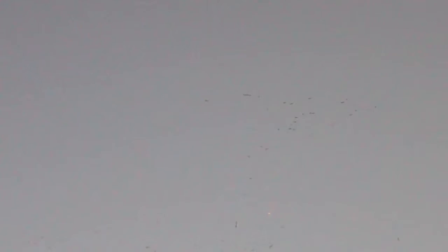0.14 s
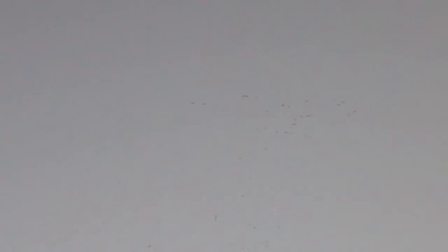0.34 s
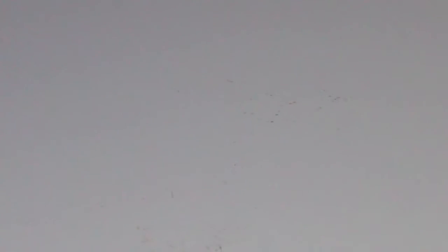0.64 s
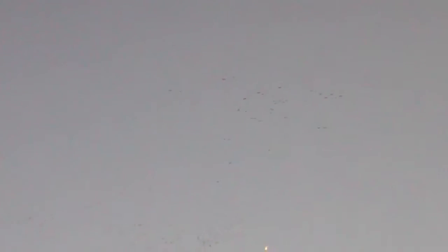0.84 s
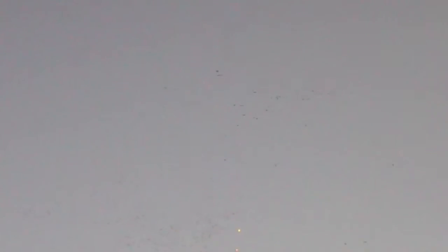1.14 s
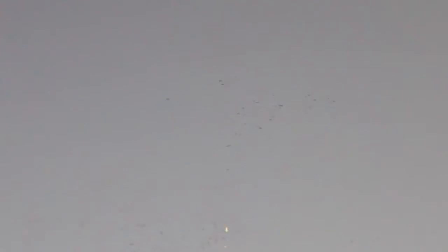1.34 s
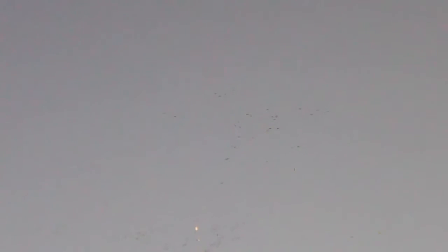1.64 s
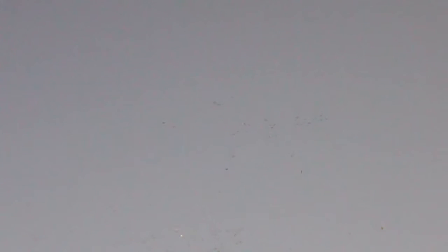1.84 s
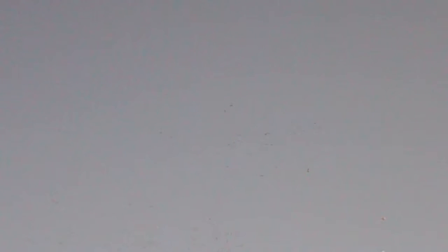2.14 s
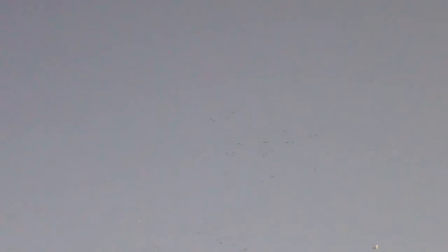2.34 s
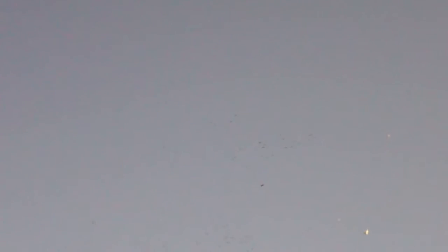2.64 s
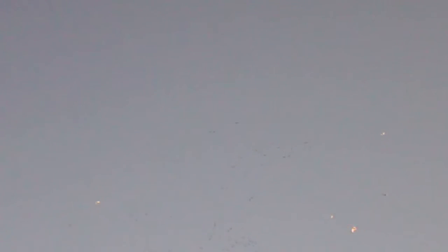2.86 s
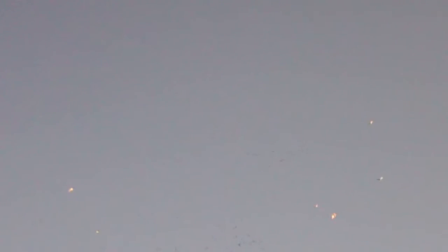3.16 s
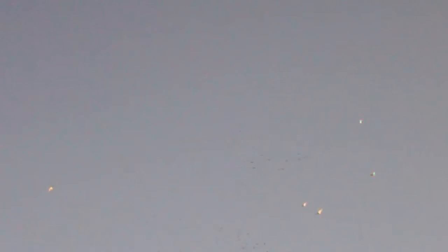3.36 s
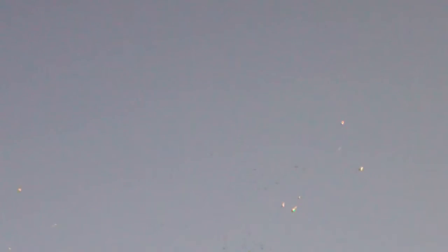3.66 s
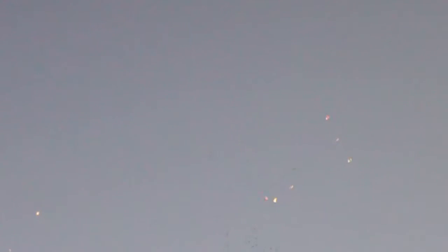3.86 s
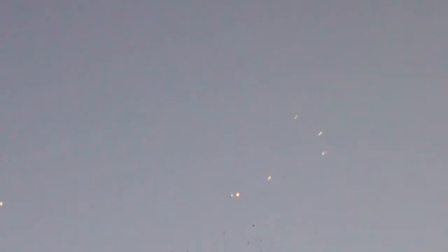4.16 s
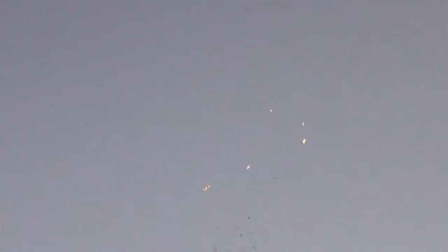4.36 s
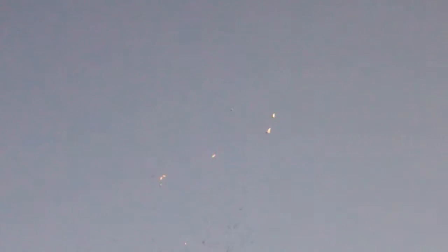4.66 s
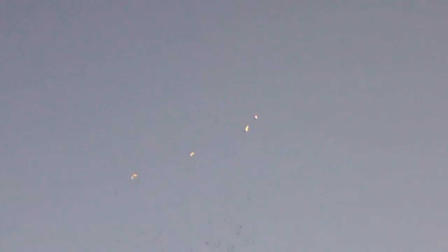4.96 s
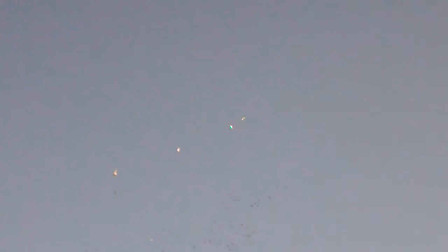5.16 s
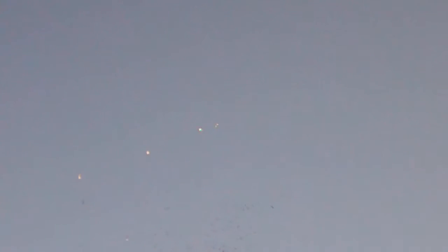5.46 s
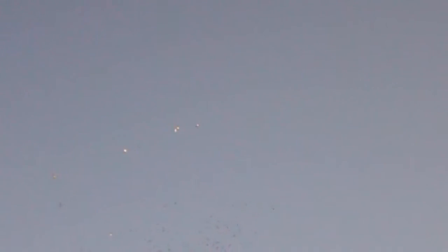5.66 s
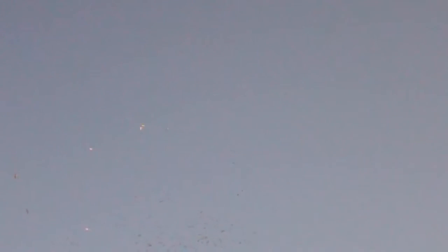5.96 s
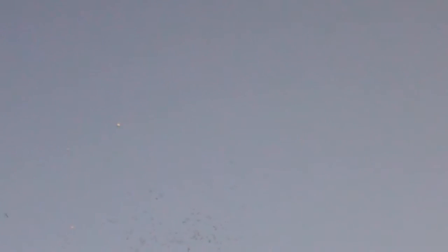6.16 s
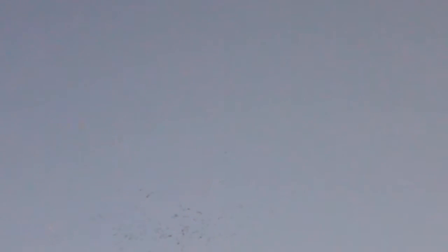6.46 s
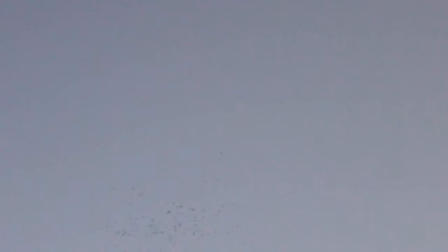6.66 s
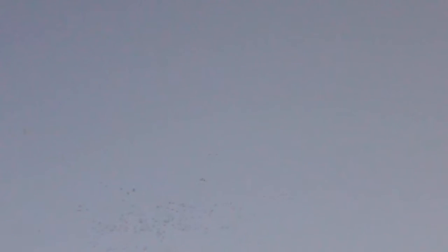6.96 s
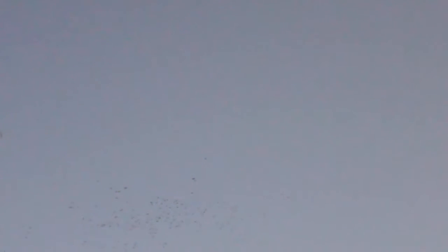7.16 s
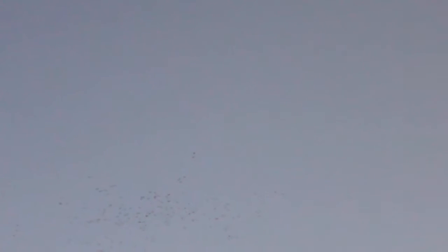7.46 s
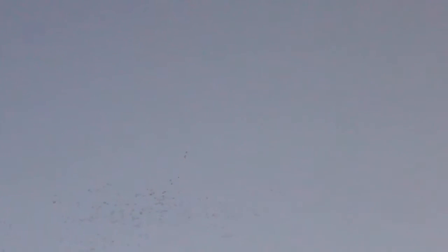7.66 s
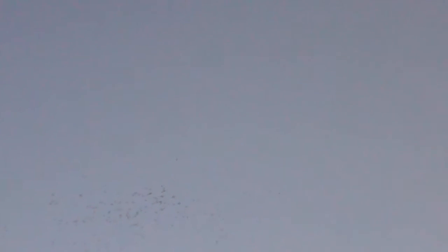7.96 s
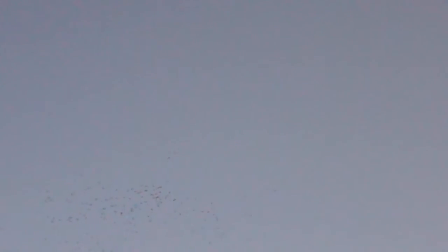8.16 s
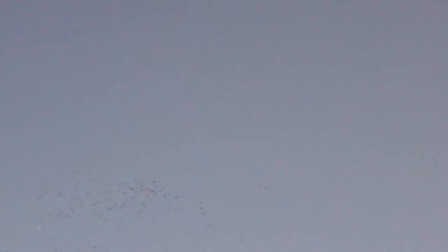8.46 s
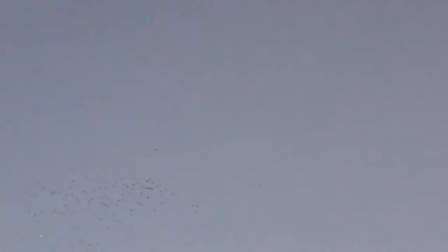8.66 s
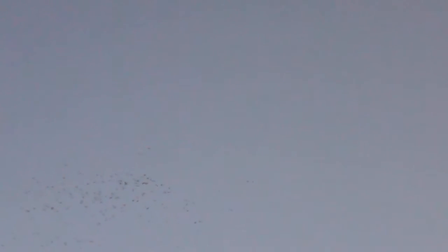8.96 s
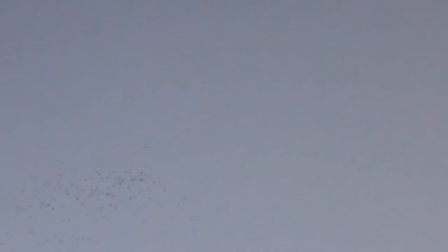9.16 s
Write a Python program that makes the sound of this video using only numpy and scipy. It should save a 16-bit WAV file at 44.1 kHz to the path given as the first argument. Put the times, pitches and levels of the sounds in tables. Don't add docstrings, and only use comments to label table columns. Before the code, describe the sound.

Hundreds of flying crow-like birds chatter in surges while nearer gulls yelp and cry, with hoarse falling caws later, thinning toward the end.

```python
import sys
import numpy as np
from scipy import signal
from scipy.fft import rfft, irfft, next_fast_len
from scipy.io import wavfile
from scipy.ndimage import uniform_filter1d, map_coordinates

SR = 44100
rng = np.random.default_rng(int(sys.argv[2]) if len(sys.argv) > 2 else 0)


def undo_db(level):
    steps = np.asarray(level, float) / 20
    return 10 ** steps


def put_to_file(sound):
    columns = np.atleast_2d(sound).T
    safe = np.clip(columns, -1, 1)
    whole_steps = np.round(safe * 32767)
    wavfile.write(sys.argv[1], SR, whole_steps.astype(np.int16))


N = 410571

# freq_hz, density_db_per_hz
AIR_SPECTRUM = [(20, -22), (40, -10), (78, -2), (150, -8.5), (290, -3.5), (420, -8), (560, -5),
                (1100, -4.5), (2000, -9), (3200, -17.5), (7900, -21.5), (14200, -18)]
# freq_hz, correlation
AIR_LIKENESS = [(60, 0.98), (400, 0.81), (1500, 0.83), (5000, 0.015)]
# freq_hz, level_db
CAMERA_WHINE = (7300, -71.5)

# time_s, level_db
MURMUR = [(0, -48), (3.6, -45.5), (6, -50.5), (6.5, -45.5), (7.5, -45), (8, -54), (8.6, -61.5), (9.31, -59)]
# middle_s, half_length_s, level_db
SURGES = [(.01, 0.13, -43), (0.437, 0.21, -40.5), (0.833, 0.16, -41.5), (1.2, 0.2, -41.5),
          (1.723, 0.26, -45.5), (2.594, 0.27, -46.5), (3.253, 0.25, -42.5), (4.685, 0.13, -43.5),
          (7.036, 0.087, -40), (7.367, 0.18, -45.5), (8.243, 0.07, -52.5), (9.095, 0.16, -43.5)]
# middle_s, half_length_s, level_db
OUTBURSTS = [(1.99, 0.037, -46), (2.16, 0.052, -49.5), (3.77, 0.035, -42), (3.97, 0.065, -46.5),
             (4.169, 0.04, -44.5), (4.385, 0.057, -41.5), (4.87, 0.057, -47.5), (5.031, 0.043, -41),
             (5.3, 0.054, -46.5), (5.49, 0.062, -44), (5.67, 0.054, -43.5), (5.82, 0.056, -41),
             (6.09, 0.11, -41), (6.32, 0.075, -42), (6.6, 0.12, -44), (6.75, 0.058, -40.5),
             (6.86, 0.039, -39), (7.56, 0.034, -38.5), (7.71, 0.036, -44.5), (7.82, 0.068, -45),
             (8.78, 0.035, -45.5)]
# freq_hz, gain_db
THROAT = [(500, -33), (850, -11), (1250, -6), (1650, 3), (2400, -4), (2850, -8), (3300, -16), (5000, -18.5),
          (7500, -27)]

# start_s, length_s, start_hz, end_hz, level_db
WHISTLES = [(0.074, 0.11, 1257, 1252, -49), (0.218, 0.049, 2410, 1980, -44.5),
            (.566, 0.052, 2255, 1930, -42), (1.306, 0.046, 2020, 1990, -43), (.405, 0.053, 2000, 1450, -38),
            (2.119, 0.14, 2946, 2960, -46.5), (2.5, 0.15, 2800, 2944, -42.5),
            (2.91, 0.11, 1777, 1723, -48.5), (3.94, 0.036, 2600, 2150, -42.5),
            (4.325, 0.045, 2500, 2410, -44), (5.131, 0.063, 2510, 2230, -45.5),
            (8.59, 0.079, 1850, 1850, -61), (2.78, 0.058, 2950, 2960, -50)]
# start_s, length_s, start_hz, end_hz, level_db
CHAKS = [(0.314, 0.03, 1194, 1070, -38), (1.7, 0.035, 2600, 2250, -40.5), (1.9, 0.022, 880, 1700, -42),
         (1.865, 0.022, 2700, 2160, -40), (8.052, 0.02, 2300, 2120, -44.5), (2.6, 0.019, 2040, 2600, -34),
         (2.7, 0.016, 2690, 2380, -29), (3.675, 0.025, 2690, 2540, -40), (3.911, 0.055, 1860, 1920, -42),
         (4.6, 0.036, 2500, 2400, -43), (4.997, 0.034, 2830, 2660, -40), (9.19, 0.023, 2320, 2200, -44),
         (5.9, 0.026, 2500, 2260, -36), (7.3, 0.02, 2200, 2380, -38), (5.9, 0.022, 2570, 2500, -35),
         (7.232, 0.039, 2290, 1900, -40), (7.262, 0.024, 2420, 1940, -38), (7.29, 0.018, 2240, 1900, -45),
         (7.418, 0.025, 1900, 2500, -39), (7.464, 0.043, 2560, 2500, -41.5),
         (4.303, 0.024, 2597, 2200, -40.5), (3.2, .03, 2290, 2200, -43), (4.132, .03, 2345, 1900, -42),
         (4.175, 0.03, 1500, 1900, -43), (5.5, .025, 2500, 2900, -37), (6.745, 0.019, 3000, 2400, -40),
         (3.532, 0.02, 3100, 1400, -35), (1, .02, 1300, 1800, -41), (.512, 0.0327, 2300, 1700, -39),
         (7.4, .02, 1856, 1500, -38), (3.285, 0.056, 2620, 2620, -36.5), (6.945, 0.02, 2700, 1980, -36),
         (7.512, 0.017, 2450, 2100, -35.5), (7.54, .016, 2380, 1900, -37), (8.242, 0.029, 1893, 1555, -45),
         (8.696, 0.011, 1303, 1320, -40), (6.3, 0.027, 3100, 2300, -34), (7.125, 0.012, 2690, 2490, -32),
         (8.944, 0.011, 2750, 3400, -41), (11, 0.0097, 1330, 1330, -32), (9.233, 0.028, 2680, 2280, -35)]
# start_s, level_db
PIPS = [(4.14, -48), (4.252, -45), (6.05, -36), (6.55, -41), (6.88, -48), (6.972, -39), (7.01, -37),
        (7.69, -41), (7.773, -45), (7.966, -45), (6.36, -49.5)]

# rows (time_s, pitch_hz, partial_2_db, brightness_db),
# then partials 1, 3, 4, 5, 6 re partial 2 [db]
SOLOS = [
    ([(0.312, 1168, -55, 0), (0.318, 1205, -36.5, 2), (0.346, 1265, -36.5, 8), (0.362, 1236, -24.5, -8), (0.388, 1160, -33, -9)], [-19, -15, -25, -22, -29]),
    ([(0.41, 1225, -56, 0), (0.426, 1171, -41, 3), (0.464, 1244, -52.5, 7), (0.494, 1255, -44.5, 4.5), (0.6, 1168, -42.5, 1), (0.622, 1090, -44, -12), (0.682, 1010, -47.5, -6), (0.7, 980, -59, 0)], [2, -12, -6.5, -17, -24]),
    ([(1.195, 1302, -38, 5), (1.208, 1423, -30, -3), (1.228, 1417, -31.5, 1), (1.238, 1300, -40, 6)], [-13, -12, -12, -15, -10]),
    ([(1.238, 1236, -40, 4), (1.254, 1236, -38, -1), (1.276, 1270, -46, 2), (1.29, 1124, -43, 3), (1.302, 1070, -47, -2)], [-18, -13, -8, -8, -16]),
    ([(1.47, 1260, -55, 11), (1.49, 1384, -44, 2.5), (1.556, 1426, -42, 0), (1.6, 1528, -42, 0.5), (1.628, 1520, -45, -6), (1.646, 1420, -43, 0), (1.656, 1340, -50, 6), (1.665, 1326, -47, 7)], [-5.5, -7, -5, -7, -25]),
    ([(3.15, 1080, -59, 4), (3.176, 1167, -55, 6), (3.196, 1100, -51, 0), (3.232, 1144, -51, -3), (3.28, 1164, -49, 0), (3.335, 1090, -50, 2)], [-19, -4, 3.5, -5, -8]),
]
# rows (time_s, pitch_hz, partial_2_db), then partials 1, 3, 4, 5, 6
# re partial 2 [db]
STILL_BEAK = [
    ([(0.165, 1623, -60), (0.21, 1585, -52), (0.255, 1490, -56)], [1, 6, -10, -20, -24]),
    ([(1.69, 1158, -56), (1.746, 1132, -48), (1.81, 1126, -47.5), (1.865, 1030, -50.5)], [4, -7, -3.5, -9, -6]),
    ([(1.872, 1304, -51), (1.888, 1450, -46.5), (1.952, 1340, -46), (1.99, 1303, -53), (2.02, 1100, -60)], [-6, 6, -1, -11, -20]),
    ([(1.975, 1350, -48), (1.99, 1341, -45), (2.08, 1310, -48.5), (2.125, 1140, -47)], [-9, -7, -0.5, -12, -18]),
    ([(2.228, 1343, -47), (2.258, 1377, -33), (2.302, 1433, -36), (2.334, 1350, -38), (2.362, 1220, -53)], [-11.5, -9.5, -18, -28, -28]),
    ([(2.548, 1256, -44), (2.57, 1297, -47), (2.72, 1300, -50.5), (2.76, 1243, -48), (2.8, 1110, -53)], [2.5, -4.5, 2, -8, -18]),
    ([(2.943, 1127, -49), (2.957, 1168, -37), (2.967, 1185, -35), (3.022, 1125, -38)], [-15, -2.5, -13.5, -14, -26]),
    ([(8.353, 1212, -33), (8.383, 1130, -33), (8.397, 1115, -37)], [-29, -16, -24, -24, -30]),
    ([(8.452, 1227, -41), (8.472, 1303, -38.5), (8.5, 1270, -40), (8.525, 1190, -52)], [-16, -13, -17, -16, -26]),
    ([(9.19, 1050, -52), (9.252, 1189, -59), (9.272, 1152, -57), (9.3, 1047, -59)], [-13, 2, 4, -14, -20]),
              ([(3.15, 1115, -58), (3.19, 1306, -50), (3.208, 1335, -43.5), (3.26, 1335, -48.5), (3.3, 1310, -44.5), (3.362, 1373, -44.5), (3.396, 1330, -45), (3.44, 1243, -57)], [2, -3, -6, -11, -12]),
    ([(3.3, 1127, -53), (3.335, 1296, -58), (3.378, 1250, -52), (3.435, 1086, -46.5)], [-4, -4, 5.5, -3, -14]),
    ([(3.51, 1010, -64), (3.545, 1040, -57), (3.575, 1000, -62.5), (3.605, 987, -53.5), (3.64, 970, -66)], [21, 0, 2, -6, -14]),
    ([(3.55, 1193, -45), (3.568, 1277, -45), (3.595, 1308, -49), (3.626, 1260, -47), (3.648, 1180, -55)], [-5, -4, 1.5, -7, -18]),
    ([(3.71, 1038, -46), (3.735, 1180, -39), (3.772, 1210, -33.5), (3.785, 1227, -37)], [-20, -6, -16, -20, -25]),
    ([(3.785, 1390, -50), (3.793, 1415, -39), (3.821, 1350, -45), (3.85, 1290, -57)], [-5.5, -3.5, -8, -16, -22]),
    ([(3.8, 1200, -52), (3.83, 1278, -47), (3.91, 1288, -50.5), (4.04, 1250, -50), (4.08, 1120, -45)], [-5, -6, -3, -10, -18]),
              ([(4.528, 1207, -55), (4.544, 1243, -50), (4.566, 1260, -52), (4.6, 1243, -54)], [-2, -3, 1.5, -16, -20]),
    ([(4.595, 1175, -45), (4.607, 1226, -39), (4.63, 1249, -35), (4.655, 1194, -34), (4.682, 1173, -37)], [-15, -5, -13, -15, -22]),
    ([(4.683, 1330, -49), (4.693, 1357, -41), (4.731, 1286, -53), (4.775, 1186, -48), (4.8, 1100, -51)], [-12, -3, -2.5, -12, -20]),
    ([(5.295, 987, -52), (5.325, 1190, -47), (5.35, 1245, -48), (5.365, 1295, -49), (5.392, 1285, -47)], [-10, -6, -8.5, -17, -20]),
    ([(6.02, 861, -40), (6.045, 974, -37), (6.075, 984, -37.5), (6.098, 970, -42)], [-20, -12, -12.5, -16, -17]),
    ([(6.25, 1230, -45), (6.28, 1210, -44), (6.31, 1190, -47)], [-15, -8, -10, -5, -18]),
    ([(6.75, 1218, -56), (6.76, 1216, -34), (6.8, 1135, -35.5), (6.822, 1152, -34)], [-24, -9.5, -18, -20, -28]),
    ([(7.228, 1370, -54), (7.24, 1400, -40), (7.3, 1590, -35.5), (7.335, 1630, -44), (7.362, 1623, -43.5), (7.388, 1480, -54)], [-15, -19, -11.5, -26, -30]),
]

# start_s, length_s, start_hz, end_hz, level_db
PIPING = [
    (1.176, 0.02, 1145, 1150, -34),
    (5.393, 0.0345, 1238, 1230, -49),
    (5.762, 0.066, 1134, 1150, -37.5),
    (8.397, 0.054, 1217, 1245, -41.5),
    (6.136, 0.027, 1310, 1200, -46),
]
RINGING = [
    (.26, 0.068, 1487, 1410, -53),
    (3.024, 0.052, 1318, 1254, -37),
    (5.825, 0.068, 1335, 1305, -38),
    (6.101, 0.036, 1110, 1126, -42.5),
    (7.445, .061, 1320, 1273, -44.5),
    (8.397, 0.054, 1085, 1108, -42),
]
HARSH = [
    (.85, 0.061, 1092, 1100, -48),
    (5.439, 0.057, 1232, 1206, -50.5),
    (7.355, 0.031, 993, 970, -53),
]
WAILING = [
    (4.89, .19, 1044, 1016, -49.5),
]
FULL = [
    (.77, 0.091, 1520, 1636, -51),
    (3.454, 0.056, 1200, 1130, -49.5),
]
HOOTING = [
    (.88, 0.12, 1277, 1270, -48),
    (5.89, 0.11, 1543, 1545, -45.5),
]
HOLLOW = [
    (6.63, 0.14, 1125, 1096, -50.5),
    (7.7, 0.089, 1040, 1124, -53),
    (8.075, 0.12, 1127, 1120, -53.5),
]
SHRILL = [
    (1.93, 0.035, 1220, 1310, -48),
    (8.318, 0.042, 793, 946, -46.5),
    (9.11, .1, 1125, 1134, -47),
]
MELLOW = [
    (6.135, 0.031, 1123, 1100, -42),
]
PURE = [
    (6.423, 0.02, 1353, 1287, -38),
    (6.93, 0.025, 1296, 1248, -34),
    (8.678, 0.017, 1395, 1320, -40.5),
    (8.882, 0.02, 1230, 1160, -42.5),
]
BRASSY = [
    (1.14, 0.028, 930, 1400, -40),
    (8.075, 0.048, 1300, 1160, -53),
    (.27, .03, 1170, 1220, -46.5),
]
# cries, partial_1_db, partial_3_db, higher_db, arch_share_per_s
VOICES = [(PIPING, -16.5, -10, -13.5, 0.27), (RINGING, -11.5, -6, -10.5, 0.297), (HARSH, -2, -6, 0, 0.19),
          (WAILING, -4, -9, -1.8, .55), (BRASSY, -19, -8, -9, 0.22), (MELLOW, .6, -14, -8, 0.18),
          (PURE, -15, -16.5, -23, 0.15), (HOLLOW, -10, -11, -5.5, 0.27), (SHRILL, -5, 0.6, -12, 0.117),
          (FULL, 3, -2.5, -1.1, .15), (HOOTING, 22, 0, 0, 0.139)]
# start_s, end_s, level_db
BREAKS = [
    (1.238, 1.285, -4),
    (5.395, 5.44, -3),
    (6.138, 6.17, -14),
]

# start_s, length_s, start_hz, end_hz, level_db
CAWS = [
    (4.384, 0.048, 1300, 880, -54),
    (5.983, 0.028, 1500, 1100, -41),
    (6.437, 0.064, 1344, 925, -47.5),
    (6.964, 0.041, 1340, 1003, -38),
    (7.036, 0.065, 1300, 953, -40),
    (8.714, 0.05, 1442, 930, -40.5),
    (8.749, 0.05, 1257, 794, -48),
    (8.939, 0.071, 1383, 847, -46.5),
    (8.987, 0.053, 1310, 910, -45.5),
]

# freq_hz, left_lead_rad, left_minus_right_db
PORTS = [(620, -0.15, -.5), (1500, 0.94, 0.6), (3750, 1.59, 3), (4900, 0.8, 3.5), (9500, 0.4, 0),
         (13000, -0.23, 1)]


def unit(x):
    return x / np.sqrt(np.mean(x ** 2) + 1e-20)


def along(points, hz):
    point_hz, value = np.transpose(points)
    return np.interp(np.log(hz + 1), np.log(point_hz + 1), value)


def wobble(rate_hz, size=N):
    knots = rng.standard_normal(int(size * rate_hz / SR) + 4)
    return map_coordinates(knots, [np.arange(size) * rate_hz / SR])


def filtered(x, response):
    m = next_fast_len(N + 8192)
    return irfft(rfft(x, m) * response(np.fft.rfftfreq(m, 1 / SR)), m)[..., :N]


def add(out, start_s, sound):
    part = out[:, round(start_s * SR):][:, :sound.shape[1]]
    part += sound[:, :part.shape[1]]


def syrinx(hz, partials_db, fade_s, flutter_db, broken=0.):
    size = len(hz)
    t = np.arange(size) / SR
    phase = 2 * np.pi * np.cumsum(hz * (1 + 0.00527 * wobble(67.2, size=size))) / SR
    gains = undo_db(partials_db) / np.linalg.norm(undo_db(partials_db), axis=0)
    effort_db = 14 * (hz / hz.max() - 1)
    apart = np.array([[.5], [-.5]])
    tone = 0
    for k, gain in enumerate(gains):
        level_db = k * effort_db + flutter_db * wobble(50.6, size=size) + apart * rng.normal(0, 0.81)
        partial_phase = (k + 1) * phase + apart * rng.uniform(-1.3, 1.0)
        tone = tone + gain * undo_db(level_db) * np.sin(partial_phase)
    edges = np.clip(np.minimum(t / fade_s, (t[-1] - t) / (3 * fade_s)), 0, 1)
    uneven_cycles = 1 + 2 * broken * np.cos(phase / 2)
    return np.sqrt(2) * tone * edges * uneven_cycles


def air():
    def angle(hz):
        return np.arccos(np.clip(along(AIR_LIKENESS, hz), -1, 1)) / 2

    def response(hz):
        return undo_db(along(AIR_SPECTRUM, hz)) * [np.cos(angle(hz)), np.sin(angle(hz))]

    mid, side = filtered(rng.standard_normal((2, N)), response)
    whine_hz, whine_db = CAMERA_WHINE
    whine_phase = 2 * np.pi * np.cumsum(whine_hz * (1 + .002 * wobble(2))) / SR
    level = undo_db(-48 + 0.48 * wobble(2.905))
    noise = level * unit(np.array([mid + side, mid - side]))
    return noise + undo_db(whine_db) * np.sin(whine_phase) + horn()


def bursts():
    fall_db, fall_shape = 8, 3.2
    t = np.arange(0, N + 64, 64) / SR
    power = undo_db(2 * np.interp(t, *np.transpose(MURMUR)))
    for middle_s, half_s, db in SURGES + OUTBURSTS:
        power = power + undo_db(2 * (db - fall_db * np.abs((t - middle_s) / half_s) ** fall_shape))
    return np.interp(np.arange(N) / SR, t, np.sqrt(power))


def crowd(count=1750):
    out = np.zeros((2, N))
    u = np.linspace(0, 1, 1900)
    for when, pitch, fall, length, size, side, *shares in rng.random((count, 11)):
        shape = u[::1 + int(3 * length)]
        bend = (.33 * fall - .04) * shape ** (1.2 + side)
        hz = (820 + 540 * np.sqrt(pitch)) * (1 - bend + .022 * wobble(200, size=len(shape)))
        bearing_rad = np.array([[0], [1.57 * (side - .5)]])
        phase = 2 * np.pi * np.cumsum(hz) / SR + bearing_rad
        buzz = 0
        for k, share in enumerate(shares):
            buzz = buzz + undo_db(-12 * share + 2.5 * (k == 1)) * np.sin((k + 1) * phase + 6 * share)
        add(out, when * N / SR, undo_db(-8 * size) * buzz * np.sqrt(np.sin(np.pi * shape ** .7)))
    shared, *own = rng.standard_normal((3, N))
    blur = .5 * shared + .75 * np.array(own)
    voices = unit(filtered(unit(out) + blur, lambda hz: undo_db(along(THROAT, hz))))
    voices /= np.sqrt(np.abs(uniform_filter1d(np.mean(voices ** 2, axis=0), size=1300)))
    return bursts() * undo_db(2.0 + 1.45 * wobble(30)) * voices


def chaks():
    out = np.zeros((2, N))
    pips = [(start_s, .022, 2550, 1900, db) for start_s, db in PIPS]
    for start_s, length_s, start_hz, end_hz, db in WHISTLES + CHAKS + pips:
        glide_hz = np.linspace(start_hz, end_hz, round((length_s + 0.011) * SR))
        tone = syrinx(glide_hz / 2, [-22, 0, -23, -25], fade_s=.007, flutter_db=3.5)
        add(out, start_s - .003, undo_db(db) * tone)
    return out


def ground(x):
    t = np.arange(SR // 4) / SR
    tail = rng.standard_normal((2, len(t))) * undo_db(-60 * t / 0.28)
    wet = signal.fftconvolve(x, tail / np.linalg.norm(tail[0]), axes=1)[:, :N]
    return filtered(wet, lambda hz: 1 / (1 + (hz / 3500) ** 2))


def solos():
    out = np.zeros((2, N))
    for rows, (first_db, *upper_db) in SOLOS + STILL_BEAK:
        s, *controls = np.transpose(rows)
        t = np.arange(s[0] - .002, s[-1] + 0.0061, 1 / SR)
        hz, db, *beak_db = [uniform_filter1d(np.interp(t, s, c), size=300, mode="nearest") for c in controls]
        upper = [db + sum(beak_db) + level_db for level_db in upper_db]
        partials_db = np.array([db + first_db, db] + upper)
        broken = sum(undo_db(level_db) * (t > a) * (t < b) * (abs(s[0] - a) < .01) for a, b, level_db in BREAKS)
        tone = syrinx(hz, partials_db, fade_s=0.0011, flutter_db=2.1, broken=broken)
        add(out, t[0], np.linalg.norm(undo_db(partials_db), axis=0) * tone)
    return out


def gulls():
    bend, flat_top = 0.198, 2.98
    swell_db, swell_at = 3.5, 0.57
    out = np.zeros((2, N))
    for cries, first_db, third_db, high_db, arch_per_s in VOICES:
        partials_db = [first_db, 0, third_db, high_db, high_db - 6.5, high_db - 11]
        for start_s, length_s, start_hz, end_hz, db in cries:
            t = np.arange(start_s - .003, start_s + length_s + 0.014, 1 / SR)
            u = np.clip((t - start_s) / length_s, 0, 1)
            bow_hz = bend * abs(end_hz - start_hz) + arch_per_s * length_s * start_hz
            arch_hz = start_hz + (end_hz - start_hz) * u + bow_hz * (1 - np.abs(2 * u - 1) ** flat_top)
            scoop = 0.025 * np.exp((t[0] - t) / 0.0053)
            sag = 0.064 * np.exp((t - t[-1]) / 0.0094)
            broken = sum(undo_db(level_db) * (start_s < a + .05) * (t > a) * (t < b) for a, b, level_db in BREAKS)
            tone = syrinx(arch_hz * (1 - scoop - sag), partials_db, fade_s=0.0032, flutter_db=2.0, broken=broken)
            add(out, t[0], undo_db(db - swell_db * (2.3 * (u - swell_at) ** 2 - 1 / 3)) * tone)
    return out


def caws():
    out = np.zeros((2, N))
    for start_s, length_s, start_hz, end_hz, db in CAWS:
        progress = np.linspace(0, 1, round(length_s * SR)) ** .7
        fall_hz = start_hz + (end_hz - start_hz) * progress
        tone = syrinx(fall_hz, [-18, 3.5, -7.5, -8, -16], fade_s=0.007, flutter_db=4.0, broken=0.36)
        add(out, start_s, undo_db(db) * tone)
    return out


def horn():
    swell = np.exp(-((np.arange(N) / SR - 8.1) / 0.74) ** 4)
    breath = filtered(rng.standard_normal(N), lambda hz: 1 / (1 + ((hz - 500) / 14) ** 2))
    return undo_db(-60.0) * swell * unit(breath)


def scene():
    birds = gulls() + undo_db(-0.9) * solos() + chaks() + caws()
    near = filtered(birds, lambda hz: 1 / (1 + (hz / 7200) ** 8) / (1 + (hz / 12000) ** 2))
    return near + undo_db(-3.5) * ground(near) + crowd() + air()


def band_limit(x):
    return signal.sosfilt(signal.butter(12, 15010, fs=SR, output="sos"), x)


def record(dry):
    port_hz, lead_rad, tilt_db = np.transpose(PORTS)
    apart = np.array([[.5], [-.5]])

    def ports(hz):
        level = undo_db(apart * np.interp(hz, port_hz, tilt_db))
        turn = np.exp(1j * apart * np.interp(hz, port_hz, lead_rad))
        return (hz < 14270) * level * turn

    return band_limit(filtered(dry, ports))


dry = scene()
out = record(dry)
put_to_file(out)
```